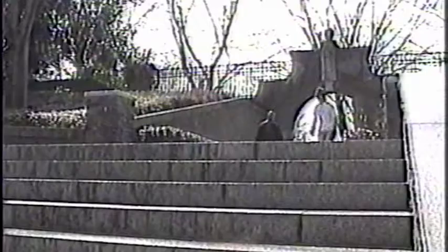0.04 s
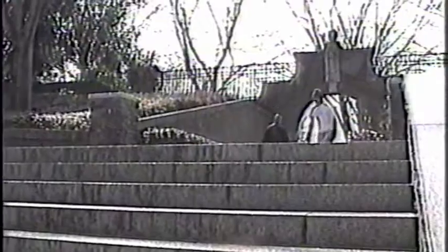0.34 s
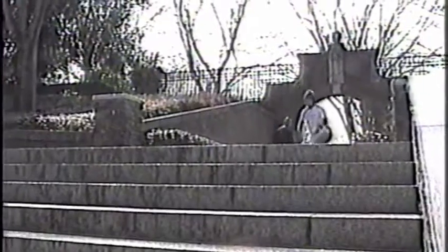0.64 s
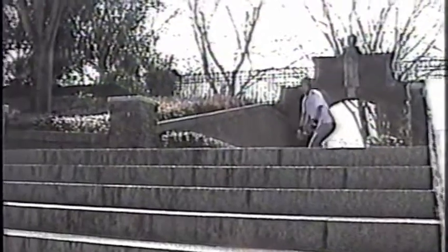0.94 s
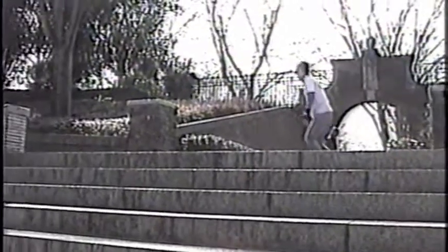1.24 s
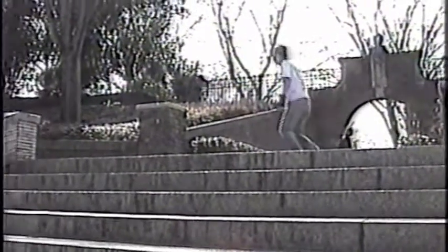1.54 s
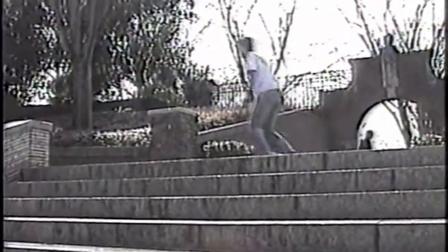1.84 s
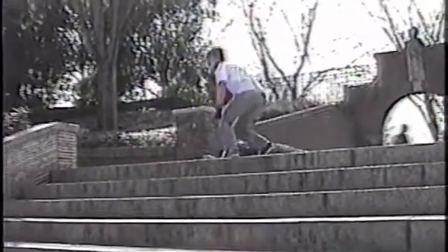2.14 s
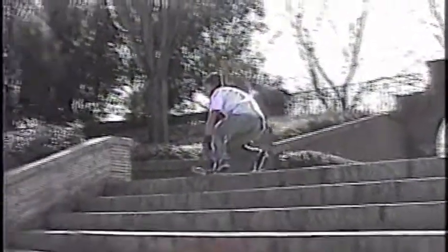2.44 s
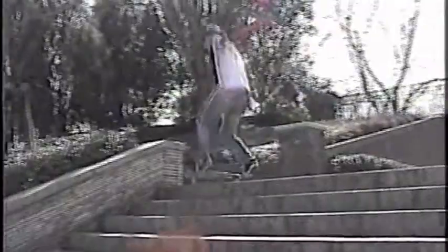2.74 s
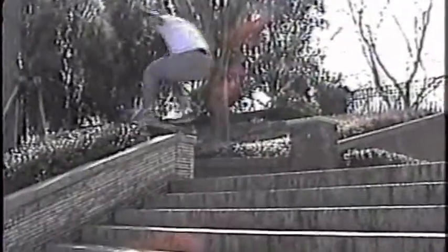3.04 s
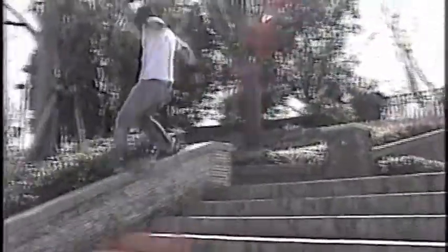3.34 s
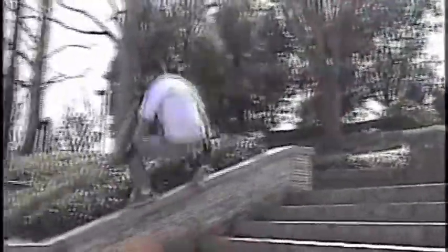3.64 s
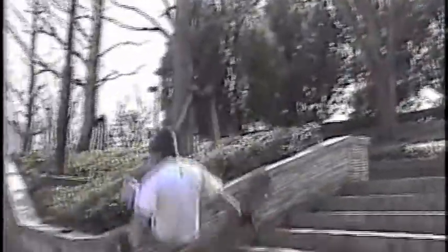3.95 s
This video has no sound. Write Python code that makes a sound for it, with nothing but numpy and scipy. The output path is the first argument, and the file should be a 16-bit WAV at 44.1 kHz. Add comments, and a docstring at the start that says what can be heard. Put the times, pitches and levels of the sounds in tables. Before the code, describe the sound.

A skateboard rolls closer over gritty paving, wheels rumbling and knocking on the joints. The tail pops, and the board clatters and scrapes down a stone ledge, squeals once and slams down. Quiet outdoor air, camcorder microphone.

```python
"""A stone courtyard. A skateboard rolls closer over rough paving: grit crunches, the wheels rumble,
hum and knock on the joints, the trucks squeak and the deck booms. The tail pops, the board lands on
a sloping ledge, clatters and scrapes down it, squeals once on a slipping wheel and slams to the ground.
A wall throws back a dull echo over quiet air; a camcorder limits the peaks and adds a thin whine."""
import sys
import numpy as np
from scipy import signal
from scipy.fft import rfft, irfft
from scipy.io import wavfile
from scipy.ndimage import uniform_filter1d

SR = 44100
rng = np.random.default_rng(int(sys.argv[2]) if len(sys.argv) > 2 else 0)


def master_out(mix):
    """Clip the mix to full scale and print it as 16-bit PCM to the path in sys.argv[1]."""
    frames = np.transpose(np.atleast_2d(mix))
    ceiling = np.clip(frames, -1, 1)
    pcm = np.round(ceiling * 32767).astype(np.int16)
    wavfile.write(sys.argv[1], SR, pcm)


N = 176400
TIME = np.arange(N) / SR

# EQ curves that give each layer its colour: freq_hz, gain_db
AIR_EQ = [(25,-4),(250,-22),(1500,-10),(13000,-31.5),(16000,-45)]  # soft outdoor bed
SIDE_AIR_EQ = [(25,26),(150,-2),(16000,-77)]  # deep air between left and right
GRIT_EQ = [(100,-42.5),(350,-5),(700,4),(930,-4.5),(1200,3),(1650,1.5),(2200,-4.5),(2800,-15.5),(4000,-22.5),(6500,-22.5),(10000,-30.5),(13500,-64)]  # midrange crunch of paving
CRACK_EQ = [(1000,-27),(2500,15.5),(3600,6.5),(6200,0.5),(10500,-5.5),(14000,-33)]  # bright, hard contact
WHEEL_EQ = [(70,-32.5),(125,-7.5),(215,1),(290,-2),(390,-18),(1800,-69.5)]  # low wheel rumble
DECK_EQ = [(250,-26.5),(420,-23),(520,3),(690,-10.5),(850,-23),(3000,-52.5)]  # hollow deck drone
KNOCK_EQ = [(70,-44),(170,-5),(380,-2.5),(620,7.5),(950,-7.5),(1600,4),(2300,-11.5),(2900,-19.5),(4200,-25),(13500,-42.5)]  # wheel on a joint
CLACK_EQ = [(25,-28),(90,-15),(430,-6.5),(680,1),(1050,0.5),(1700,2.5),(2400,-6),(5000,-36.5),(16000,-56)]  # wood on stone
THUD_EQ = [(70,-31),(145,-3.5),(240,4),(310,1.5),(420,-4.5),(4000,-68)]  # the deck's low end
GRIND_EQ = [(100,-22),(300,5),(400,-13.5),(700,2),(970,3),(1200,0.5),(1700,1.5),(2400,-5),(3300,-12.5),(16000,-44)]  # body of the scrape
HISS_EQ = [(1000,-20),(2800,4),(6500,6.5),(9000,3),(11000,-6),(16000,-32)]  # top of the scrape

# Fader for the grit under the wheels: time_s, level_db
GRIT_FADER = [(.12,-43.5),(.18,-38),(.43,-42),(.52,-36),(.75,-41.5),(1.15,-35.5),(1.37,-42.5),(1.43,-31),(1.55,-43.5),(1.63,-32.5),(1.875,-37.5),(1.887,-28),(2.01,-28),(2.05,-30.5),(2.4,-36.5),(2.75,-40),(2.83,-31.5),(2.92,-50),(3.08,-43),(3.15,-53)]
# Fader for the wheel rumble and the deck drone it drives: time_s, level_db
RUMBLE_FADER = [(.14,-45),(.22,-38),(.36,-57),(.6,-42.5),(.95,-38),(1.4,-37),(1.63,-32),(1.85,-38.5),(2.3,-31),(2.64,-31.5),(2.76,-39),(2.93,-54)]
# Ticks and crackle come forward as the board nears: time_s, gain_db
PRESENCE = [(.1,-28),(1.9,-14),(2.55,-4.5)]
# Wheels hit paving joints: start_s, level_db
JOINT_HITS = [(0.213, -19.5), (0.254, -20), (0.361, -24), (0.477, -19), (0.586, -16.5), (0.626, -13.5),
              (0.663, -17.5), (0.706, -15.5), (0.749, -17.5), (0.799, -13), (0.836, -19), (0.885, -15),
              (0.918, -16), (0.957, -15.5), (0.99, -15.5), (1.097, -14), (1.151, -15), (1.234, -16.5),
              (1.274, -19), (1.413, -18), (1.591, -20.5), (1.611, -16.5), (1.639, -15.5), (1.75, -15),
              (1.833, -15), (1.883, -14.5), (2.047, -19), (2.092, -16),  (2.239, -17.5), (2.307, -13),
              (2.4, -11.5), (2.459, -21), (2.491, -17), (2.52, -13), (2.585, -12.5), (2.636, -13.5),
              (2.694, -19), (2.757, -21.5)]
# Short squeaks of the trucks: start_s, hold_s, pitch_hz, level_db
TRUCK_SQUEAKS = [(0.329,0.0065,2110,-30.5),(0.3597,0.0018,1740,-25),(3.497,0.011,962,-29.5),(3.686,0.0021,2050,-18.5)]
# Wheels hum on ribbed paving: time_s, pitch_hz, level_db
HUM_CURVE = [(0.849,286.7,-50),(1.2,263.4,-35),(1.55,222,-38),(1.799,241.4,-35),(1.95,232,-45)]
# The board booms at dips in the paving and on the hardest blows: start_s, pitch_hz, level_db
DECK_BOOMS = [(1.636,167.8,-23.5),(2.312,610,-20.5),(2.362,615,-19.5),(2.516,154,-21.5),(2.648,155.6,-24.5),(2.692,593,-15.5),(2.991,292,-23),(3.96,323,-10.5)]
# A hard edge catches the stone: start_s, level_db
EDGE_SNAPS = [(2.44,-33),(2.99,-21),(3.1015,-26),(3.186,-22),(3.2815,-21),(3.6,-24),(3.893,-37)]
# The board strikes stone: start_s, hold_s, clack_db, thud_db, crack_db, ring_hz
BOARD_HITS = [(2.787,0.0069,-27,-29.5,-42,1620),(2.8,0.016,-21.5,-38,-32.5,1880),(2.991,0.0021,-15.5,-35,-47,1672),
              (3.1,0.012,-15.5,-23,-34,1070),(3.184,0.0073,-22,-25.5,-46,1625),(3.235,0.029,-30.5,-56,-38,1900),
              (3.278,0.015,-21.5,-31,-30,1006),(3.32,0.0077,-25,-48,-47,1018),(3.423,0.008,-25.5,-33,-36.5,916),(3.445,0.025,-28,-47,-52,1036),
              (3.552,0.0052,-24.5,-43,-39.5,1750),(3.599,0.0076,-30,-35.5,-47,1910),(3.614,0.008,-21,-48,-35.5,934),(3.63,0.0094,-28.5,-27,-35,770),
              (3.687,0.0029,-28.5,-50,-34,1660),(3.705,0.0076,-24,-31,-31,930),(3.739,0.0074,-18,-43,-32,1344),(3.774,0.01,-25,-39,-39,1157),
              (3.815,.012,-23.5,-56,-44,1883),(3.9605,0.015,-20,-19.5,-31,1196)]
# Resonances of the struck board: pitch_hz, gain_db
DECK_MODES = [(301,-18.5),(680,-16.5),(1690,-9)]
# Faders for the scrape down the ledge: time_s, grind_db, hiss_db
SLIDE_FADERS = [(3.1,-75,-45),(3.15,-34,-48),(3.22,-30.5,-53),(3.3,-24,-40.5),(3.39,-37,-37),(3.47,-32,-41),(3.535,-40,-43),(3.68,-37.5,-51),(3.73,-30,-43),(3.85,-34,-47),(3.95,-50,-49)]
# Squeal of a slipping wheel: time_s, pitch_hz, level_db
SQUEAL_CURVE = [(3.772,2600,-60),(3.778,2705,-20),(3.791,2675,-17),(3.795,2840,-35),(3.803,2890,-27),(3.811,2820,-32),(3.9,2820,-57)]
# Slapback from the wall: delay_s, gain_db
WALL_ECHOES = [(.055,-19)]

POP_S, LANDING_S = BOARD_HITS[0][0], BOARD_HITS[3][0]


def from_db(db):
    """Decibels to gain."""
    return 10 ** (np.asarray(db) / 20)


def rms_one(x):
    """Scale to unit power."""
    return x / np.sqrt(np.mean(x ** 2) + 1e-20)


def fader(rows, column=1):
    """Gain over time from a dB column; silent before its first point."""
    rows = np.array(rows)
    return from_db(np.interp(TIME, rows[:, 0], rows[:, column])) * (TIME >= rows[0, 0])


def equalise(x, curve):
    """Colour x with a causal (minimum-phase) EQ; unit power."""
    hz, db = np.transpose(curve)
    freqs = np.maximum(np.fft.rfftfreq(N, 1 / SR), 1)
    gain = from_db(np.interp(np.log(freqs), np.log(hz), db))
    cepstrum = irfft(np.log(gain))
    cepstrum[1:N // 2] *= 2
    cepstrum[N // 2 + 1:] = 0
    return rms_one(irfft(rfft(x) * np.exp(rfft(cepstrum))))


def bandpass(x, band_hz):
    """Keep one band, with gentle slopes."""
    return signal.sosfilt(signal.butter(2, band_hz, "band", fs=SR, output="sos"), x)


def wobble(samples, passes=2):
    """Random modulation, smoothed by moving averages; unit power."""
    x = rng.standard_normal(N)
    for _ in range(passes):
        x = uniform_filter1d(x, samples)
    return rms_one(x)


def glide_phase(curve, waver):
    """Phase of an oscillator following a pitch curve, bent by the fraction waver."""
    times, hz, _ = np.transpose(curve)
    return 2 * np.pi * np.cumsum(np.interp(TIME, times, hz) * (1 + waver)) / SR


def grains(eq, per_s, spread_db):
    """Tiny random contacts of uneven size, coloured by an EQ."""
    sizes = from_db(spread_db * np.minimum(rng.exponential(1, N), 4))
    clicks = sizes * rng.choice([-1, 1], N) * (rng.random(N) < per_s / SR)
    return equalise(clicks, eq)


def rattle(eq, even_s):
    """A dense run of contacts, its level evened out over even_s."""
    x = grains(eq, per_s=5000, spread_db=2.84)
    power = np.abs(uniform_filter1d(x ** 2, int(even_s * SR)))
    return x / np.sqrt(power + 1e-4)


def bursts(starts, holds, dbs, attack_s, t60_s):
    """Attack, hold and release envelopes, summed in power."""
    power = np.zeros(N)
    for start, hold, db in np.broadcast(starts, holds, dbs):
        i = int(start * SR)
        t = TIME[:min(N - i, SR // 3)]
        attack = np.minimum(t / attack_s, 1)
        release = from_db(db - 60 * np.maximum(t - hold, 0) / t60_s)
        power[i:i + len(t)] += (attack * release) ** 2
    return np.sqrt(power)


def resonator(x, hz, t60_s):
    """One decaying mode driven by x; unit power."""
    radius, angle = from_db(-60 / (t60_s * SR)), 2 * np.pi * hz / SR
    return rms_one(signal.lfilter([1, 0, -1], [1, -2 * radius * np.cos(angle), radius ** 2], x + 1e-18))


def ping(start_s, hold_s, db, hz, t60_s=0.06, jitter_rad=0):
    """A briefly driven metallic tone; phase jitter roughens it."""
    envelope = bursts(start_s, hold_s, db, attack_s=0.0011, t60_s=t60_s)
    return envelope * np.sqrt(2) * np.sin(2 * np.pi * hz * (TIME - start_s) + jitter_rad)


def outdoor_air():
    """A quiet bed of air as mid and side; the side is mostly deep rumble."""
    mid = from_db(-51) * equalise(rng.standard_normal(N), AIR_EQ)
    side = from_db(-60) * equalise(rng.standard_normal(N), SIDE_AIR_EQ)
    return mid, side


def rolling():
    """The wheels crunch over grit, crush single grains, rumble and set the deck droning."""
    crackle = fader(PRESENCE) * (TIME < POP_S) * grains(CRACK_EQ, per_s=160, spread_db=4.5)
    flutter = from_db(3.3 * wobble(samples=420))
    crunch = grains(GRIT_EQ, per_s=1300, spread_db=1.0)
    grit = fader(GRIT_FADER) * flutter * (crunch + from_db(-10) * crackle)
    rumble = rattle(WHEEL_EQ, even_s=0.054)
    drone = from_db(-4.5) * rattle(DECK_EQ, even_s=0.021)
    return grit + fader(RUMBLE_FADER) * (rumble + drone) * (TIME < LANDING_S)


def joint_knocks(hold_s=0.0062, gap_s=0.014, second_db=-10, ring_range_hz=(558, 2088)):
    """Each joint gives a knock, a tick and a brief ring, then a softer knock as the next wheel crosses."""
    starts, dbs = np.transpose(JOINT_HITS)
    second_starts = starts + gap_s * rng.uniform(0.47, 2, len(starts))
    knock_dbs = dbs - 11.5
    first = bursts(starts, hold_s, knock_dbs, attack_s=0.00041, t60_s=0.043)
    second = bursts(second_starts, hold_s / 2, knock_dbs + second_db, attack_s=0.00041, t60_s=0.043)
    knock = np.hypot(first, second) * rattle(KNOCK_EQ, even_s=0.0092)
    tick = bursts(starts + 0.00116, 0, dbs - 16.5, attack_s=0.00018, t60_s=0.038)
    tick *= fader(PRESENCE) * rattle(CRACK_EQ, even_s=0.0018)
    pitches = np.exp(rng.uniform(*np.log(ring_range_hz), len(starts)))
    rings = sum(ping(start, 0, db - 16, hz) for start, db, hz in zip(starts, dbs, pitches))
    return knock + tick + rings


def truck_squeaks():
    """The trucks give short, rough chirps."""
    jitter = 0.7 * wobble(samples=60)
    return sum(ping(start, hold, db, hz, t60_s=0.024, jitter_rad=jitter)
               for start, hold, hz, db in TRUCK_SQUEAKS)


def wheel_hum():
    """Ribbed paving draws a rough, wavering hum from the wheels; it ends lower than it starts."""
    phase = glide_phase(HUM_CURVE, waver=0.065 * wobble(samples=900, passes=1))
    swell = from_db(4.7 * wobble(samples=900, passes=1))
    return fader(HUM_CURVE, column=2) * rms_one(swell * np.sin(phase)) * (TIME < HUM_CURVE[-1][0])


def deck_booms(rise_cycles=1.82):
    """One low mode of the board swells into a round boom and dies quickly."""
    out = np.zeros(N)
    for start, hz, db in DECK_BOOMS:
        cycles = np.maximum(TIME - start, 0) * hz
        age = cycles / rise_cycles
        out += from_db(db) * age ** 2 * np.exp(2 - 2 * age) * np.sin(2 * np.pi * cycles)
    return out


def edge_snaps():
    """A hard edge hits or catches on the stone: a very short, bright snap."""
    starts, dbs = np.transpose(EDGE_SNAPS)
    bright = rms_one(bandpass(rng.choice([-1., 1.], N), band_hz=(2200, 6800)))
    return bright * bursts(starts, 0.0028, dbs, attack_s=0.00028, t60_s=0.02)


def board_hits():
    """Wood clacks, the deck thuds and metal cracks on stone, with a deep thump under each hit."""
    starts, holds, clack_db, thud_db, crack_db, _ = np.transpose(BOARD_HITS)
    force = bursts(starts, holds, clack_db, attack_s=0.0013, t60_s=0.036)
    clack = force * rattle(CLACK_EQ, even_s=0.0038)
    thud = bursts(starts, holds, thud_db, attack_s=0.00096, t60_s=0.048) * rattle(THUD_EQ, even_s=0.011)
    crack = bursts(starts, holds, crack_db, attack_s=0.00064, t60_s=0.079)
    crack *= rattle(CRACK_EQ, even_s=0.015)
    thump = from_db(-16.5) * bandpass(force, band_hz=(27.8, 129))
    return clack + thud + crack + thump + deck_ring(force)


def deck_ring(force, detune=0.05):
    """The board's modes ring on, at a slightly different random pitch for each hit."""
    contacts = force * rng.standard_normal(N)
    latest_hit = np.searchsorted(np.array(BOARD_HITS)[:, 0], TIME) - 1
    out = np.zeros(N)
    for hit in range(len(BOARD_HITS)):
        drive = contacts * (latest_hit == hit)
        for hz, db in DECK_MODES:
            pitch = hz * (1 + rng.uniform(-detune, detune))
            out += np.std(drive) * from_db(db) * resonator(drive, pitch, t60_s=0.14)
    return out


def truck_rings():
    """Each hit brings out one metallic ring, its pitch set by where the blow lands."""
    return sum(ping(start, hold / 2, clack_db - 3, hz) for start, hold, clack_db, _, _, hz in BOARD_HITS)


def ledge_slide():
    """The board grinds over the stone's grain and hisses along its edge, gripping and slipping."""
    grind = fader(SLIDE_FADERS) * grains(GRIND_EQ, per_s=1100, spread_db=1.5)
    hiss = fader(SLIDE_FADERS, column=2) * grains(HISS_EQ, per_s=5600, spread_db=2.0)
    grip = from_db(2 * wobble(samples=400))
    return (grind + hiss) * grip


def wheel_squeal(harmonics_db=(0, -19, -24)):
    """A wheel sticks and slips: one short, shrill tone with an unsteady pitch."""
    phase = glide_phase(SQUEAL_CURVE, waver=0.0142 * wobble(samples=60, passes=1))
    tone = sum(from_db(db) * np.sin(k * phase) for k, db in enumerate(harmonics_db, 1))
    return fader(SQUEAL_CURVE, column=2) * tone * (TIME < SQUEAL_CURVE[-1][0])


def courtyard_reverb(x, t60_s=0.29, build_s=0.0056, top_hz=3500):
    """A slapback off the wall and a thin scattered tail, both dulled."""
    t = TIME[:SR]
    response = rng.standard_normal(SR) * from_db(-60 * t / t60_s) * np.minimum(t / build_s, 1)
    response *= from_db(-13.5) / np.linalg.norm(response)
    for delay, db in WALL_ECHOES:
        response[int(delay * SR)] += from_db(db)
    dull = signal.sosfilt(signal.butter(1, top_hz, fs=SR, output="sos"), response)
    return signal.fftconvolve(x, dull)[:N]


def scene(balance_db=-0.25):
    """The board and its echoes over quiet outdoor air, almost mono."""
    board = rolling() + wheel_hum() + joint_knocks() + deck_booms()
    board += board_hits() + edge_snaps() + truck_rings() + truck_squeaks()
    board += ledge_slide() + wheel_squeal()
    air, side = outdoor_air()
    mid = board + courtyard_reverb(board) + air
    return np.array([mid * from_db(balance_db / 2) + side, mid * from_db(-balance_db / 2) - side])


def record(dry, limit=0.24, release_db_per_s=497, whine_hz=15734, buzz_hz=59.94):
    """The camcorder: a fast limiter, a buzzing line whine, a fade-in and a steep top cut."""
    over_db = np.maximum(20 * np.log10(np.abs(dry).max(axis=0) / limit + 1e-9), 0)
    release_db = release_db_per_s * TIME
    reduction_db = np.maximum.accumulate(over_db + release_db) - release_db
    limited = dry * from_db(-uniform_filter1d(reduction_db, size=16))
    whine = sum(0.45 ** k * np.sin(2 * np.pi * (whine_hz - k * buzz_hz) * TIME) for k in range(3))
    fade_in = np.interp(TIME, (0.11, 0.18), (0, 1))
    top_cut = signal.cheby2(16, 60, 16300, fs=SR, output="sos")
    return signal.sosfilt(top_cut, (limited + from_db(-61.5) * whine) * fade_in)


dry = scene()
out = record(dry)
master_out(out)
```